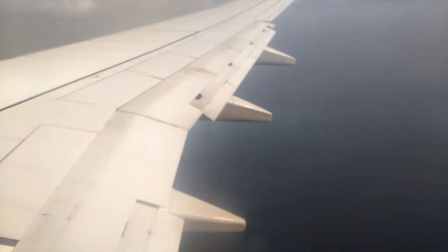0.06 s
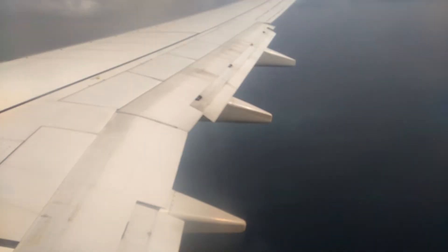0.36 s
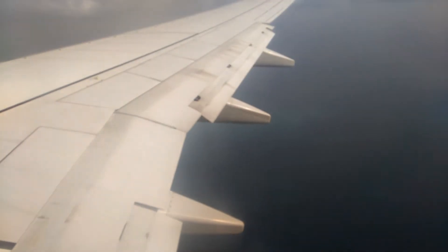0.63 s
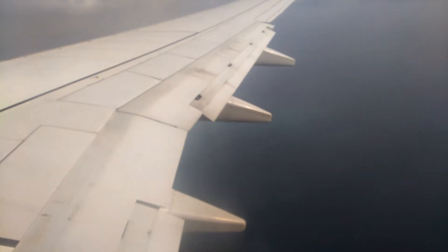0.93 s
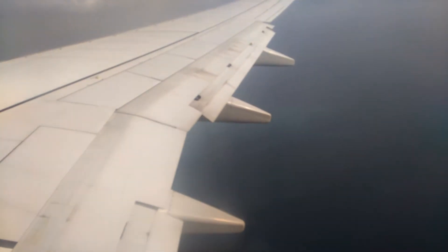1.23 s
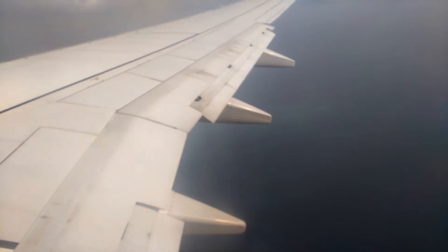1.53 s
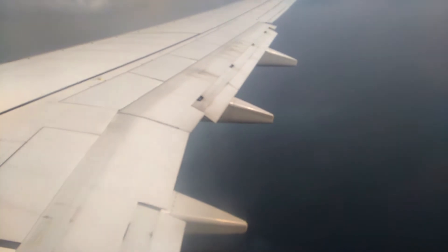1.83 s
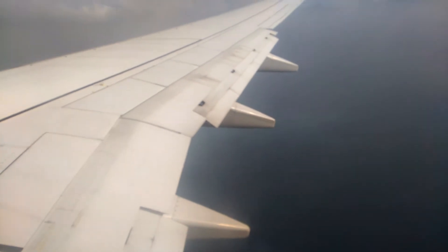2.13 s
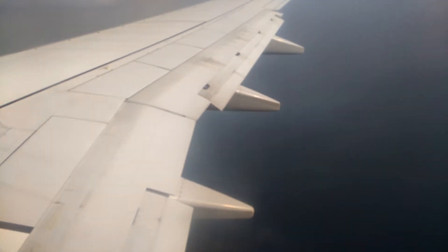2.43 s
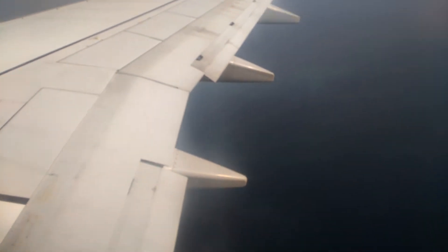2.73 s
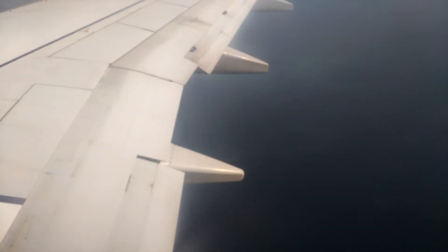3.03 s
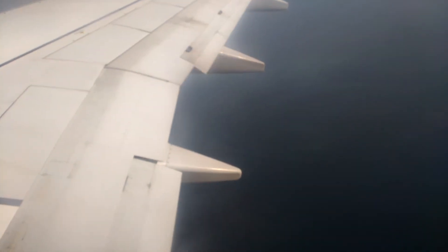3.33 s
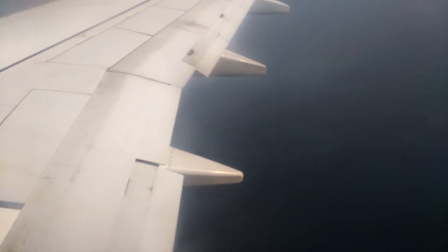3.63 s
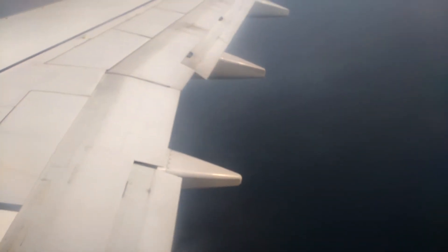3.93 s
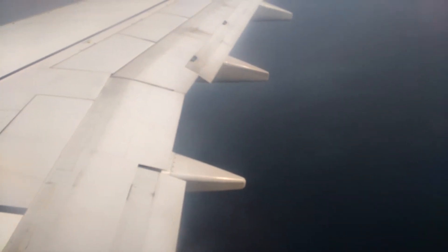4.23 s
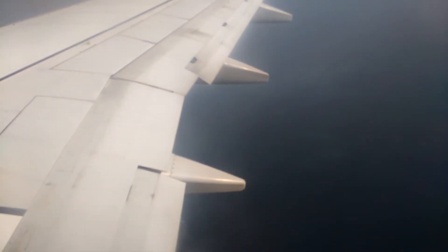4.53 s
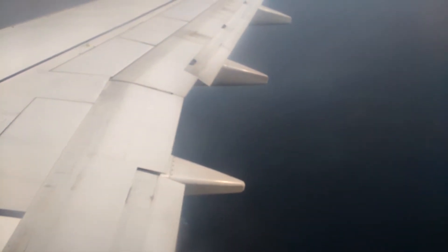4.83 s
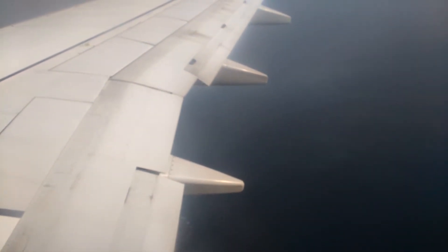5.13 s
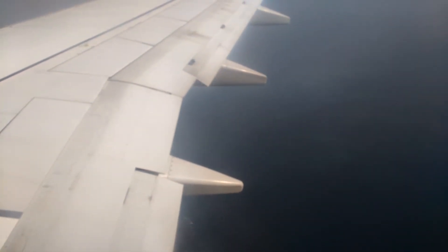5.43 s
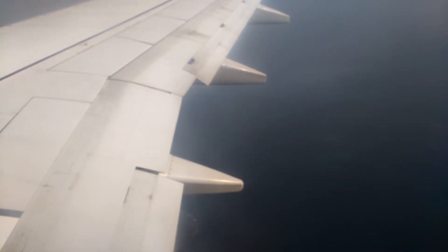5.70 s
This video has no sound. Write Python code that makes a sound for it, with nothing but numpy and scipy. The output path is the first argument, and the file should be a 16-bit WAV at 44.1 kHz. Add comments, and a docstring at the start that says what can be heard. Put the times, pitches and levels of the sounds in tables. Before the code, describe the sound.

Inside a jet airliner in flight, engines and airflow make a continuous low rumble that swells briefly now and then. A thin ventilation hiss and a faint, broad whine sit above it. From about two seconds in, plastic trim knocks dully several times near the microphone, with soft cloth brushing and a few light ticks. The whine changes tone slightly halfway through, and the drone carries on.

```python
"""A window seat in a jet airliner in flight.
Engines and airflow shake the cabin into a low rumble that swells briefly now and then. Above it sit a
thin hiss of ventilation and a faint, broad whine, which changes colour as the microphone tilts down
halfway through. Close by, plastic trim knocks dully, something ticks lightly and cloth brushes."""
import sys
import numpy as np
from scipy import signal
from scipy.fft import rfft, irfft, next_fast_len
from scipy.io import wavfile
from scipy.ndimage import uniform_filter1d

SR = 44100
rng = np.random.default_rng(int(sys.argv[2]) if len(sys.argv) > 2 else 0)


def master_out(mix):
    """Clip the mix to full scale and print it as 16-bit PCM to the path in sys.argv[1]."""
    frames = np.transpose(np.atleast_2d(mix))
    ceiling = np.clip(frames, -1, 1)
    pcm = np.round(ceiling * 32767).astype(np.int16)
    wavfile.write(sys.argv[1], SR, pcm)


N = 258426
FFT_SIZE = next_fast_len(N)
T = np.arange(N) / SR
HZ = np.maximum(np.fft.rfftfreq(FFT_SIZE, 1 / SR), 1)


def from_db(db):
    """Decibels to gain."""
    return 10 ** (np.asarray(db) / 20)


def rms_one(x):
    """Scale to unit power."""
    return x / np.sqrt(np.mean(x ** 2) + 1e-20)


def automation(rows):
    """A level or position at every sample, ramping between breakpoints."""
    return np.interp(T, *np.transpose(rows))


def colour(points):
    """An EQ curve: gain at every frequency from a few points."""
    hz, db = np.transpose(points)
    return from_db(np.interp(np.log(HZ), np.log(hz), db))


def band(hz, width_hz):
    """Gain of a resonance, 12 dB down at width_hz either side of its centre."""
    return 1 / (1 + ((HZ - hz) / width_hz) ** 2) ** 2


def noise(gain, channels=1):
    """Steady noise of a given colour, unrelated between channels; rms 1."""
    shape = (channels, len(HZ))
    white = rng.standard_normal(shape) + 1j * rng.standard_normal(shape)
    return rms_one(irfft(gain * white, FFT_SIZE)[:, :N])


def equalise(x, gain):
    """Apply a gain at every frequency."""
    return irfft(rfft(x, FFT_SIZE) * gain, FFT_SIZE)[:, :N]


def low_pass(x, edge_hz, order=2):
    """Causal Butterworth low-pass."""
    return signal.sosfilt(signal.butter(order, min(edge_hz, SR * .45), fs=SR, output="sos"), x)


def pan(left_db):
    """Stereo gains that put the left channel left_db above the right."""
    return from_db(np.array([[.5], [-.5]]) * left_db)


def decay(start, t60):
    """An envelope that jumps to 1 and falls 60 dB in t60 seconds."""
    return (T >= start) * from_db(-60 * np.clip((T - start) / t60, 0, 4))


def swell(middle, half_s):
    """A bell-shaped envelope that rises and fades."""
    return np.exp(-.5 * ((T - middle) / half_s) ** 2) + 1e-9


def waver(rate_hz, size=4096):
    """A slow random wander of spread 1."""
    hz = np.arange(size // 2 + 1) * SR / N
    slow = irfft(rfft(rng.standard_normal(size)) / (1 + (hz / rate_hz) ** 2) ** 2)
    return np.interp(T, np.linspace(0, N / SR, size), rms_one(slow))


def steadied(x, span_s):
    """Hold the short-term power of a noise at 1."""
    return x / np.sqrt(uniform_filter1d(x ** 2, max(int(span_s * SR), 2)) + 1e-12)


# Airflow, easing in smoother air; it also drives whine and rumble. Each row: time in seconds, gain in dB.
AIRFLOW = [(0, 1), (1.1, 1.5), (1.65, 1.5), (1.95, -2), (2.45, -6), (3.2, 1.5), (3.55, -2.5), (3.77, -0.5),
           (4.0, 1), (4.9, 1.76), (5.86, 0)]
# Tone of the air bed. Each row: frequency in Hz, gain in dB.
RUSH_EQ = [(30, -0.5), (60, 10.5), (150, 11.5), (330, 3.5), (560, 3), (900, -1), (1200, -11), (1550, -10.5),
           (2300, -12.5), (3100, -24), (4600, -27.5), (8000, -27.5), (11000, -32), (14000, -35)]


def air_rush(level_db=-48, gust_db=0.88, gust_hz=16, follows_flow=0.17):
    """Air along the skin and from the vents arrives from all sides, never quite even."""
    db = level_db + follows_flow * automation(AIRFLOW) + gust_db * waver(gust_hz)
    return from_db(db) * noise(colour(RUSH_EQ), channels=2) * pan(left_db=-0.6)


# The microphone's move. Each row: time in seconds, tilt from 0 (level) to 1 (down).
MIC_TILT = [(0, 0.12), (2.3, 0.093), (3.1, 0.71), (5.86, 1)]
# Bands of whine and hiss. Each row: centre in Hz, width in Hz, level in dB untilted,
# level in dB tilted, pan in dB to the left.
WHINE_BANDS = [(568, 55, -71, -58.5, -3.5), (897, 110, -68.5, -85.5, -11.5), (1059, 54, -65, -70, 3.5),
               (1323, 60, -81, -94, 10.5), (1920, 230, -74.5, -71.5, 14.5), (2081, 136, -69.5, -69, 1),
               (2446, 60, -86.5, -79.5, 11), (2680, 180, -83.5, -86, -15.5), (3390, 320, -82, -88.5, 7),
               (3840, 600, -82, -89.5, 8.5), (5140, 630, -94, -94.5, 17.5), (8550, 300, -88, -96.5, 1),
               (10300, 470, -99, -95.5, -16.5)]
# Fader ride on the whole whine. Each row: time in seconds, gain in dB.
WHINE_RIDE = [(0, .5), (1.9, -1.5), (2.3, -.3), (3.7, 1), (4.4, 1.2), (4.9, 2.5), (5.86, 1)]


def whine(waver_db=3.5, waver_hz=19, follows_flow=0.24):
    """Turbulence in the fans and ducts sings in narrow bands, each wavering on its own."""
    tilt = automation(MIC_TILT)
    out = 0
    for hz, width_hz, level_db, tilted_db, left_db in WHINE_BANDS:
        db = level_db + tilt * (tilted_db - level_db) + waver_db * waver(waver_hz)
        out = out + noise(band(hz, width_hz)) * from_db(db) * pan(left_db)
    return out * from_db(automation(WHINE_RIDE) + follows_flow * automation(AIRFLOW))


# Faint rubs. Each row: peak time and half length in seconds, level in dB, centre and width in Hz.
RUBS = [(.92, 0.11, -74, 3900, 540), (0.403, 0.051, -61, 1260, 310), (1.323, 0.037, -57.5, 1310, 260),
        (4.22, 0.27, -76, 5060, 850), (4.223, 0.0067, -49.5, 840, 90), (4.332, 0.016, -50.5, 1050, 100)]


def scrapes():
    """Light rubbing, each stroke sounding in one narrow band."""
    return sum(from_db(db) * swell(s, half_s) * noise(band(hz, width_hz), channels=2)
               for s, half_s, db, hz, width_hz in RUBS)


# Tone of the fabric. Each row: frequency in Hz, gain in dB.
CLOTH_EQ = [(2500, -12), (4700, -13.5), (5800, -7.5), (8000, 1), (10000, -5), (14000, -2.5)]
# Distinct brushes. Each row: peak time and half length in seconds, level in dB, low-pass in Hz.
CLOTH_BRUSHES = [(0.034, 0.044, -66, 9100), (0.593, 0.03, -69, 11000), (0.815, 0.018, -61, 9500),
                 (0.872, 0.024, -64, 13000), (0.933, 0.089, -66.5, 12600), (1.91, 0.042, -63, 10500),
                 (2.556, 0.019, -61, 11000), (2.61, 0.031, -59.5, 12500), (2.65, 0.012, -62.5, 9500),
                 (2.707, 0.044, -68.5, 10500), (3.215, 0.029, -64, 14000), (3.83, 0.023, -53, 8100)]


def cloth(start_s=1.4, end_s=3.9, fade_s=0.84, rustle_db=-69.5, uneven_db=3.0, grain_db=2.5,
          catches_per_s=160, catch_db=-6):
    """Sliding cloth hisses and its catching fibres add tiny snaps: a soft rustle, plus brushes."""
    catches = (rng.random(N) < catches_per_s / SR) * rng.standard_normal((2, N))
    snaps = rms_one(equalise(catches, colour(CLOTH_EQ)))
    hiss = noise(colour(CLOTH_EQ), channels=2) * from_db(-grain_db * waver(rate_hz=350))
    fabric = rms_one(hiss + from_db(catch_db) * snaps)
    # The rustle fades in and out around the main part of the microphone's move.
    moving = np.clip(np.minimum(T - start_s, end_s - T) / fade_s + .5, 0, 1)
    rustle = fabric * moving * from_db(rustle_db + uneven_db * waver(rate_hz=8))
    out = low_pass(rustle + 1e-18, edge_hz=10400, order=4)
    for s, half_s, db, top_hz in CLOTH_BRUSHES:
        brush = from_db(db) * swell(s, half_s) * np.roll(fabric, rng.integers(N), axis=1)
        out = out + low_pass(brush, top_hz, order=4)
    return out * pan(left_db=3.0)


# Tone of a tick. Each row: frequency in Hz, gain in dB.
TICK_EQ = [(2500, -15), (4500, -4.5), (5900, 2), (8000, 1.5), (11000, -2), (14000, -12)]
# Light ticks. Each row: start in seconds, level in dB, decay time in seconds, ring pitch in Hz,
# ring boost in dB, scatter send in dB.
TICK_CUES = [(1.4829, -48.5, 0.036, 5900, 15, -14.5), (2.9622, -64, .02, 7600, 2, -23),
             (3.248, -57.5, 0.041, 5830, 9, -15), (4.579, -54, 0.075, 7950, 12, -11),
             (5.29, -66, 0.079, 6000, 4, -5)]


def ticks(scatter_t60=0.62, seat_delay_s=0.0028, seat_db=-1, seat_t60=0.008):
    """Small hard contacts snap and ring, click as the part seats, and scatter round the cabin."""
    scatter = noise(colour(TICK_EQ), channels=2)
    click = noise(band(hz=11000, width_hz=6000), channels=2)
    out = 0
    for s, db, t60, ring_hz, ring_db, scatter_db in TICK_CUES:
        ring = from_db(ring_db * band(ring_hz, width_hz=800))
        snap = noise(colour(TICK_EQ) * ring, channels=2) * decay(s, t60)
        seating = from_db(seat_db) * click * decay(s + seat_delay_s, seat_t60)
        tail = from_db(scatter_db) * scatter * decay(s, scatter_t60)
        out = out + from_db(db) * (snap + seating + tail)
    return out * pan(left_db=-4.0)


# Ring of the plastic panel. Each row: pitch in Hz, level in dB, decay time in seconds.
TRIM_MODES = [(330, 1.5, 0.069), (452, 6.5, 0.035), (648, 11, 0.014), (800, 9, 0.017), (910, 11.5, 0.012),
              (1200, 8, 0.011), (1350, 3.5, 0.01), (1700, -4, 0.024), (1950, -5, 0.014), (2374, -7, 0.012),
              (3250, -9.5, 0.0075), (4400, -21, .016)]
# Dull knocks. Each row: start in seconds, attack level in dB, contact low-pass in Hz,
# chatter decay time in seconds, thud level in dB.
KNOCK_CUES = [(1.9075, -39, 3200, .02, -57), (1.9103, -37, 3600, 0.19, -52), (2.094, -48, 1400, .03, -52),
              (2.354, -41.5, 1700, 0.049, -40), (2.367, -45.5, 2000, 0.059, -55),
              (2.59, -41, 2080, 0.033, -53), (2.607, -49, 696, 0.044, -25), (2.6305, -45, 1700, 0.022, -38),
              (2.6345, -38, 2000, 0.13, -34), (2.686, -45, 2000, 0.12, -43), (3.2838, -38, 2100, 0.16, -49),
              (3.5983, -40, 1410, 0.018, -55), (3.613, -44, 1150, 0.022, -38)]


def trim_knocks(crunch_db=-16, crunch_t60=0.015, chatter_db=-26, tail_db=-41, cabin_t60=.33,
                crack_db=10, mode_spread_db=2.5, thud_t60=0.053, attack_s=.008):
    """A soft contact crunches, chatters and rings the panel; its push adds a low thud."""
    out, size = np.zeros((2, N)), SR // 3
    t = T[:size]
    modes = np.array([(-1) ** k * from_db(db - 60 * t / t60) * np.sin(2 * np.pi * hz * t)
                      for k, (hz, db, t60) in enumerate(TRIM_MODES)])
    body = steadied(noise(band(hz=300, width_hz=220)), span_s=0.012)
    for s, db, contact_hz, chatter_t60, thud_db in KNOCK_CUES:
        # The modes answer differently to each blow.
        panel = from_db(mode_spread_db * rng.standard_normal(len(modes))) @ modes
        crunch = from_db(crunch_db - 60 * t / crunch_t60) * rng.standard_normal(size)
        chatter = from_db(chatter_db - 60 * t / chatter_t60) * rng.standard_normal(size)
        reflections = from_db(tail_db - 60 * t / cabin_t60) * rng.standard_normal((2, size))
        force = (t == 0) + crunch + chatter + reflections
        ring = signal.fftconvolve(force, panel[None])[:, :size]
        knock = low_pass(ring + from_db(crack_db) * force, contact_hz, order=4)
        knock *= from_db(db) / np.std(knock[:, t < attack_s])
        at = int(s * SR)
        out[:, at:at + size] += knock[:, :N - at]
        thud = from_db(thud_db) * body * decay(s, thud_t60)
        out += low_pass(thud + 1e-18, contact_hz)
    return out * pan(left_db=-4.5)


# Tone of the engines and airflow. Each row: frequency in Hz, gain in dB.
RUMBLE_EQ = [(20, -28), (33, -32), (46, -6), (60, 0), (85, -5), (120, -4.5), (210, -7), (320, -9.5),
             (385, -17.5), (500, -25.5), (720, -38.5), (1050, -43), (1400, -61), (3000, -77.5)]
# Cabin air and panel resonances. Each row: centre in Hz, width in Hz, boost or cut in dB.
CABIN_RESONANCES = [(112.7, 11, 3.5), (140, 24.3, -6.5), (159.2, 32, 7), (293.2, 52, 3.5), (636, 64, 6.5)]
# Brief swells in the low rumble. Each row: peak time and half length in seconds,
# boom gain in dB, roar gain in dB.
RUMBLE_SWELLS = [(1.011, 0.02, 7.5, -2.5), (1.55, 0.027, 2, 0.5), (2.311, 0.067, 8, 2.5),
                 (2.608, 0.11, 7.5, 3), (2.845, 0.021, 7.5, -1), (3.597, 0.017, 9, 1),
                 (4.125, 0.024, 8.5, 0.5), (4.584, 0.033, 6, 2.5), (5.063, 0.015, 11.5, -1.5),
                 (5.64, 0.019, 13.5, 2)]
# Gusts lift one band of the roar. Each row: peak time and half length in seconds, level in dB,
# centre and width in Hz.
GUSTS = [(2.136, 0.15, -38.5, 306, 118), (3.206, .06, -47.5, 468, 100), (3.479, 0.049, -29, 240, 111),
         (3.63, 0.045, -31.5, 244, 90), (4.7, 0.06, -47.5, 510, 128), (4.97, 0.051, -49, 538, 110),
         (5.45, 0.057, -34.5, 271, 96)]
# The rumble leans right. Each row: frequency in Hz, left relative to right in dB.
RUMBLE_PAN = [(50, -4.5), (90, -3), (170, -5.5), (240, -2.5), (400, -3), (550, -4)]


def rumble(boom_base_db=-29.5, roar_base_db=-34.5, split_hz=140, tilt_loss_db=4, buffet_db=2.0,
           buffet_hz=11, span_s=.1, lead_rad=0.26, lead_top_hz=280, diffuse_db=-18):
    """Engines and airflow shake the cabin: a deep boom and a roar above it, each buffeted on its own."""
    tone = colour(RUMBLE_EQ)
    for hz, width_hz, db in CABIN_RESONANCES:
        tone = tone * from_db(db / (1 + (2 * (HZ - hz) / width_hz) ** 2))
    flow = automation(AIRFLOW)
    boom_db = boom_base_db + flow - tilt_loss_db * automation(MIC_TILT) + buffet_db * waver(buffet_hz)
    roar_db = roar_base_db + flow + buffet_db * waver(buffet_hz)
    for s, half_s, more_boom_db, more_roar_db in RUMBLE_SWELLS:
        boom_db += more_boom_db * swell(s, half_s)
        roar_db += more_roar_db * swell(s, half_s)
    low_share = 1 / (1 + (HZ / split_hz) ** 10)
    boom = steadied(noise(tone * np.sqrt(low_share)), span_s) * from_db(boom_db)
    roar = steadied(noise(tone * np.sqrt(1 - low_share)), span_s) * from_db(roar_db)
    for s, half_s, db, hz, width_hz in GUSTS:
        roar += from_db(db) * swell(s, half_s) * steadied(noise(band(hz, width_hz)), span_s)
    # Long waves reach both ears almost alike, the left a little ahead.
    lead = np.exp(1j * lead_rad / (1 + (HZ / lead_top_hz) ** 4))
    left = np.sqrt(colour(RUMBLE_PAN) * lead)
    ears = equalise(boom + roar, [left, 1 / left])
    diffuse = noise(tone, channels=2) * from_db(roar_base_db + flow + diffuse_db)
    return ears + diffuse


def scene():
    """Air and whine, the small sounds near the seat, and the rumble that fills the cabin."""
    return air_rush() + whine() + scrapes() + cloth() + ticks() + trim_knocks() + rumble()


def record(dry):
    """A 5 ms fade at each end and a steep high cut."""
    fade_s, cutoff_hz = .005, 14250
    fades = np.sin(np.pi / 2 * np.clip(np.minimum(T, T[-1] - T) / fade_s, 0, 1)) ** 2
    high_cut = signal.ellip(12, .1, 90, cutoff_hz, fs=SR, output="sos")
    return signal.sosfilt(high_cut, dry * fades)


dry = scene()
out = record(dry)
master_out(out)
```